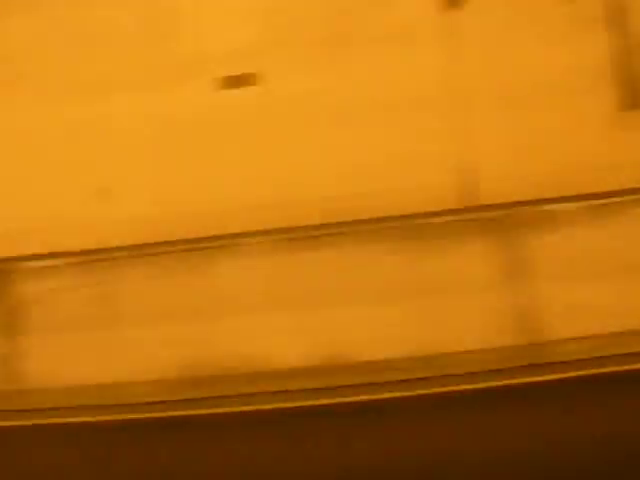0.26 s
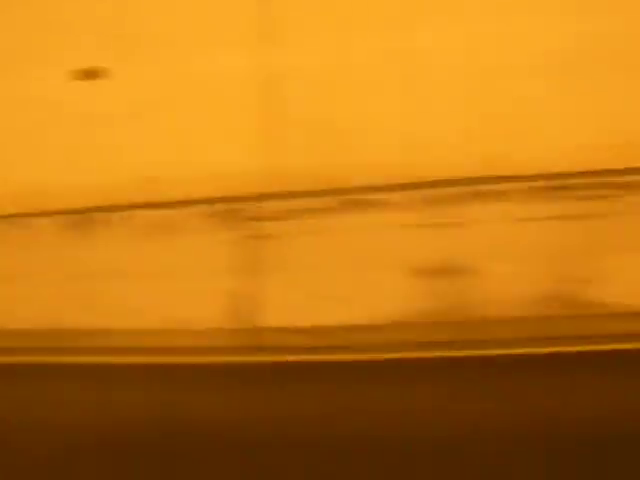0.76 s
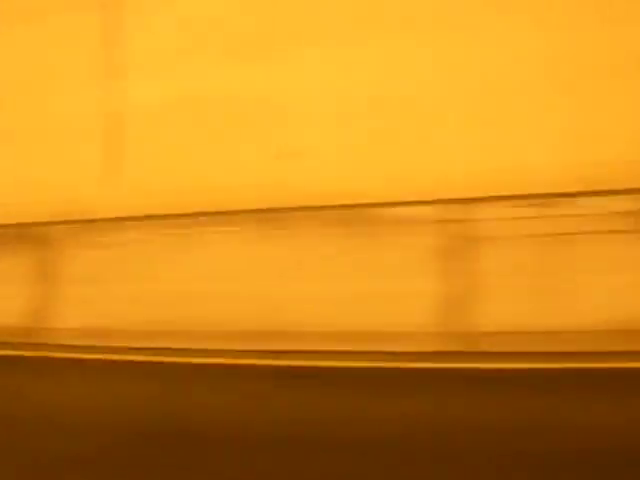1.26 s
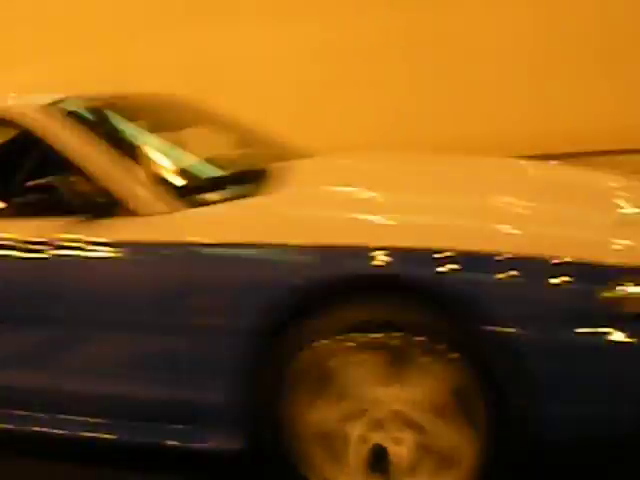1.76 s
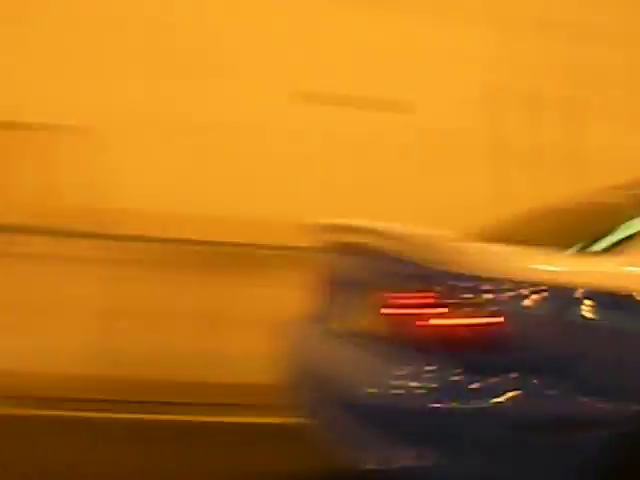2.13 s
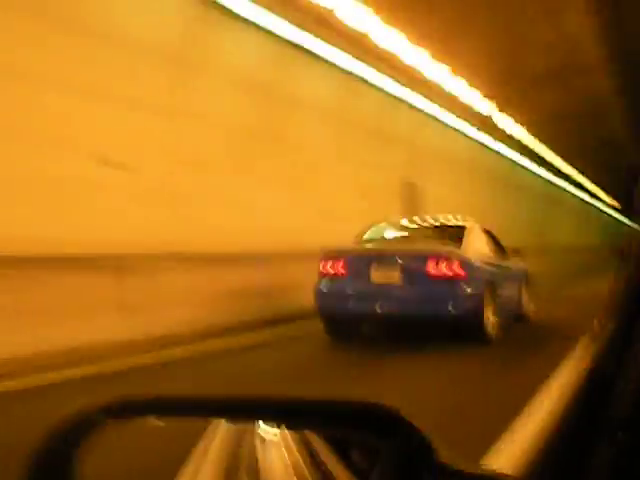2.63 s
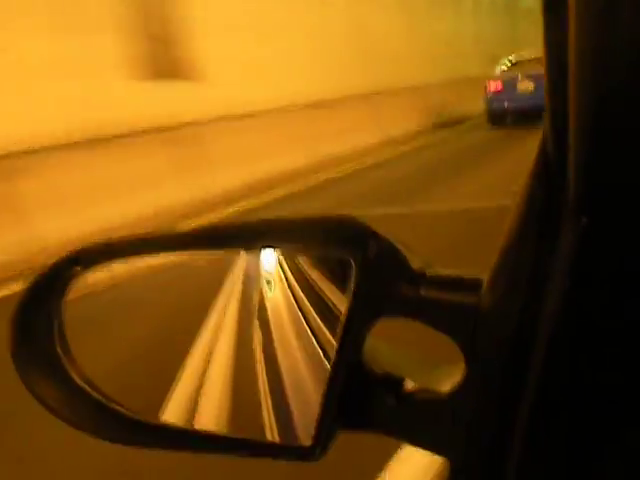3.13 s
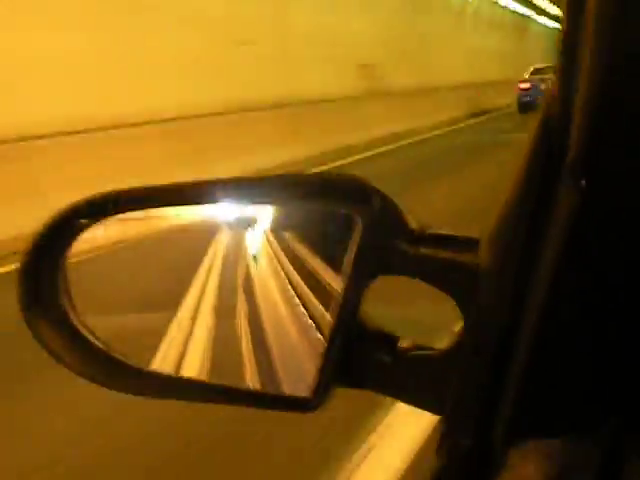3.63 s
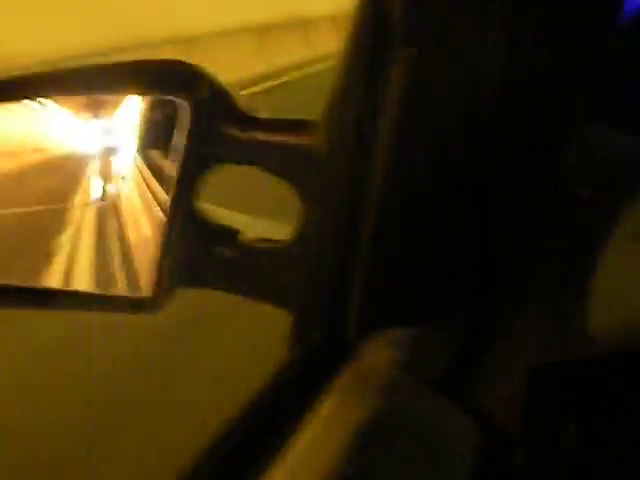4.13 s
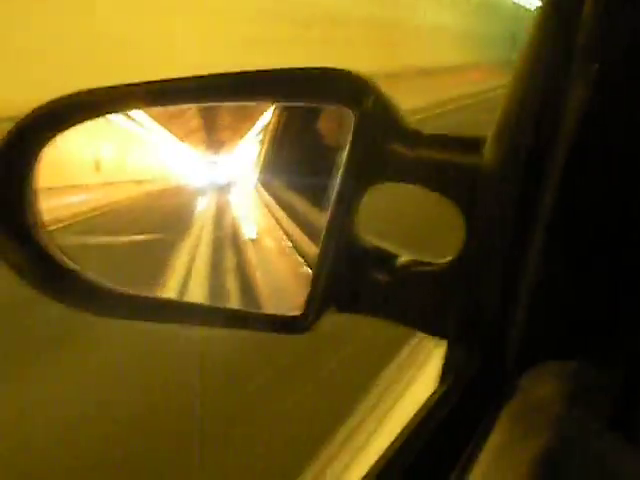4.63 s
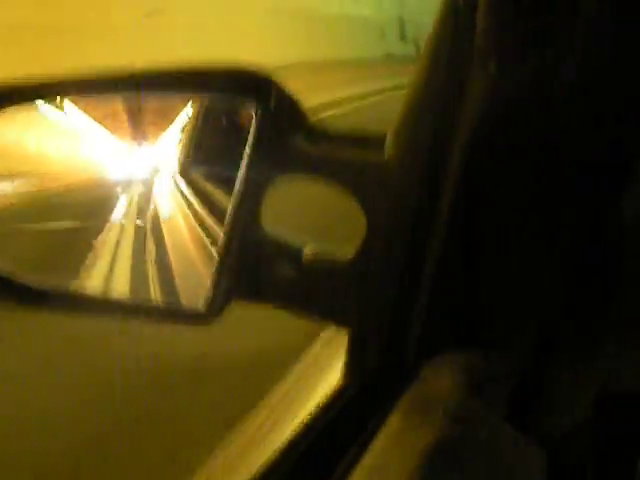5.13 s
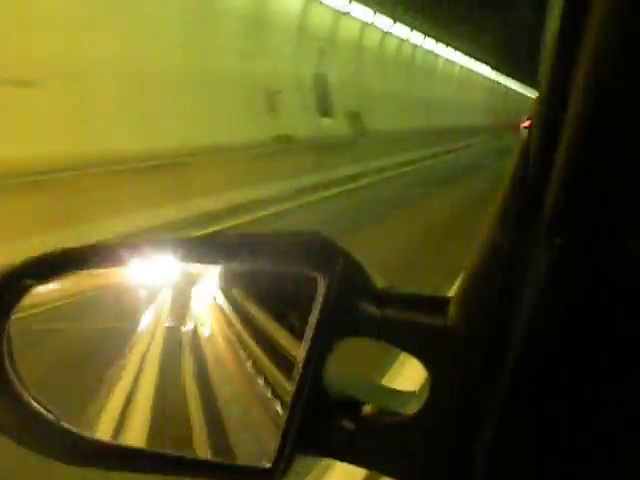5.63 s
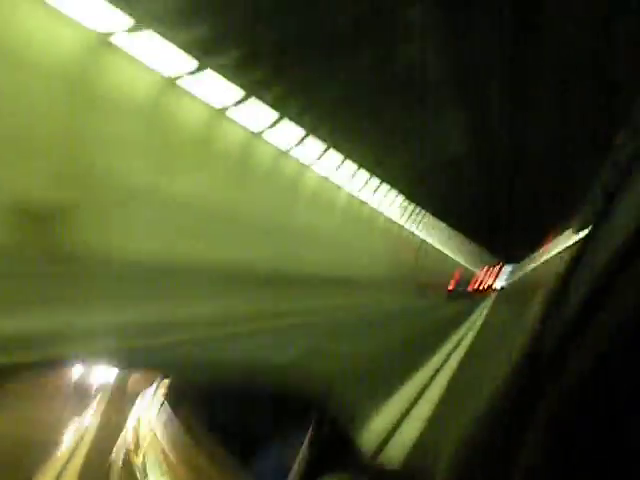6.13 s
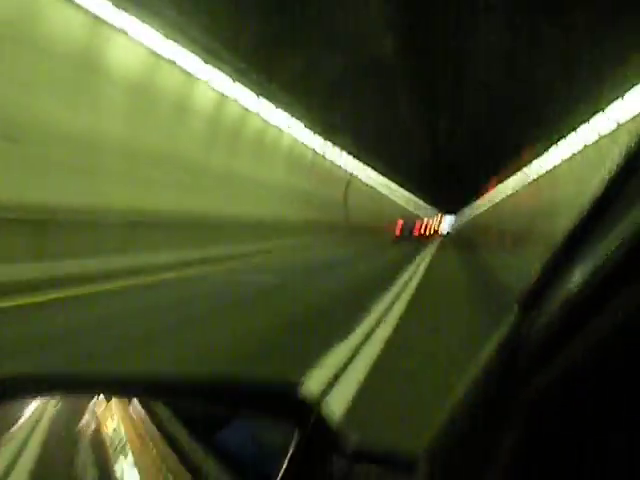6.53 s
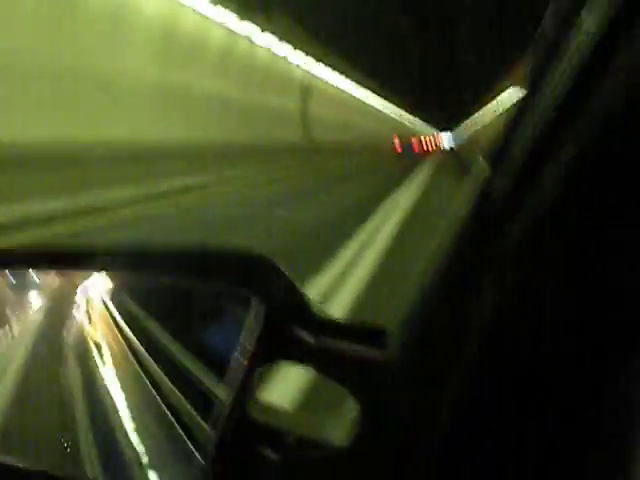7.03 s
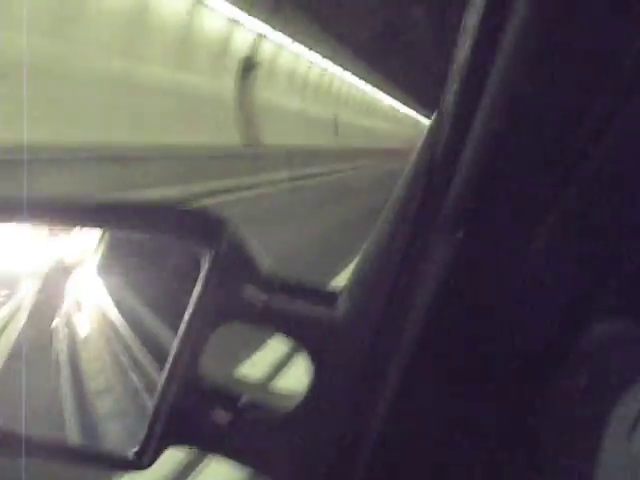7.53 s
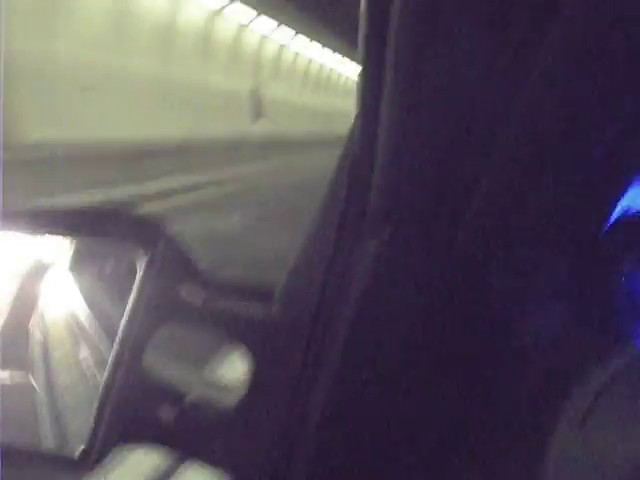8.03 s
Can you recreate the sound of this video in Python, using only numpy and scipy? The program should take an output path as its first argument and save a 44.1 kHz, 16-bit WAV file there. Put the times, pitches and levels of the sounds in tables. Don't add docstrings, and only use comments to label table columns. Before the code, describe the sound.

From a moving car's open window in a concrete tunnel: low traffic roar and a distant engine, then an eight-cylinder car swells past with harsh exhaust rasp and sharp cracks, and pulls ahead. The camera car's own engine climbs beneath. From six seconds, slipstream slaps, thuds and spits on a small, clipping, narrow-band microphone, nearly burying the road.

```python
import sys
import numpy as np
from scipy import signal
from scipy.fft import rfft, irfft, next_fast_len
from scipy.io import wavfile
from scipy.ndimage import uniform_filter1d

SR = 44100
rng = np.random.default_rng(int(sys.argv[2]) if len(sys.argv) > 2 else 0)


def dump_mix(stems):
    frames = np.atleast_2d(stems).T
    limited = np.clip(frames, -1, 1)
    pcm = np.round(limited * 32767).astype(np.int16)
    wavfile.write(sys.argv[1], SR, pcm)


def ratio_of_db(decibels):
    return 10 ** (np.asarray(decibels, float) / 20)


N = 364707
T = np.arange(N) / SR

# (time [s], rate [Hz])
PASSER_FIRING = [(.7, 277), (1.0, 281), (1.4, 292), (1.8, 301), (2.1, 313), (2.4, 307), (2.9, 309),
                 (3.4, 319), (4.7, 322)]
# (multiple of an eighth of the firing rate, level against the firing tone [dB])
PASSER_LINES = [(5, -29), (7, -14), (8, 0), (10, -10), (11, -12), (13, -14), (16, -4), (19, -14), (21, -13),
                (22, -11), (24, -5), (26, -7.5), (27, -11), (34, -13)]
# (alongside [s], level there [dB], held in the tube [dB], gain from behind [dB])
PASSER_TONE_PASS = (2.28, -21.5, -34, 0.5)
# (time [s], level [dB], half width [s])
PASSER_BEATS = [(1.4, 2, .15), (1.7, -3, .1), (1.95, -2, .06), (2.2, 2, .1), (2.45, 2, .08),
                (2.65, -5, .06), (2.85, 1, .1), (3.2, -4, .12), (3.46, 4, .06), (3.65, -4, .06),
                (3.95, 2, .2)]
# (time [s], level [dB], half width [s])
TAILPIPE_SWELLS = [
    (2.25, -2, .15),
    (2.6, 2, .1),
    (3.15, 6, .3),
]


def overtaking_tone():
    tone_db = overtaking(*PASSER_TONE_PASS, lift_s=4.5, fade_db=30)
    tone_db = tone_db - 70 * np.maximum(1.0 - T, 0)
    tone_db = tone_db + bumps(PASSER_BEATS)
    return engine(PASSER_FIRING, tone_db, PASSER_LINES, upper_db=bumps(TAILPIPE_SWELLS))


# (frequency [Hz], level [dB])
RASP_COLOUR = [(90, -58), (150, -33), (240, -22), (310, -12.5), (440, -20), (610, -7.5), (800, -8),
               (1000, -4.5), (1400, -9.5), (2250, -9.5), (3000, -10.5), (3700, -14), (5000, -11.5)]
# (alongside [s], level there [dB], held in the tube [dB], gain from behind [dB])
PASSER_RASP_PASS = (2.26, -13.6, -25, 3.2)
# (time [s], level [dB], half width [s])
RASP_SWELLS = [
    (2.19, .4, .05),
    (2.36, .6, .05),
    (2.5, .6, .04),
    (2.62, -1.2, .06),
    (2.85, -.3, .06),
]


def overtaking_rasp(cycle):
    puffs = 1 + 0.18 * np.cos(8 * cycle) + 0.083 * np.cos(cycle) + 0.17 * np.cos(3 * cycle)
    gas = colour(puffs * rng.standard_normal(N), RASP_COLOUR, flicker_db=.6)
    closest_s, sweep_s, leaving_s, ground_ms = 2.21, .2, .5, .54
    since = T - closest_s
    alongside = 1 / np.sqrt(1 + (since / np.where(since < 0, sweep_s, leaving_s)) ** 2)
    bounce = np.interp(T - ground_ms / 1000 * alongside, T, gas)
    share = .36 * alongside ** 2
    heard = (gas + share * bounce) / np.sqrt(1 + share ** 2)
    level_db = overtaking(*PASSER_RASP_PASS, lift_s=3.25, fade_db=13) + bumps(RASP_SWELLS) + 3.0
    return heard * ratio_of_db(level_db)


def overtaking(alongside_s, near_db, trapped_db, behind_db, lift_s, fade_db):
    gap_s = .2
    along = (T - alongside_s) / gap_s
    distance = np.hypot(1, along)
    direct = ratio_of_db(near_db + behind_db * along / distance) / distance
    return 10 * np.log10(direct ** 2 + ratio_of_db(trapped_db) ** 2) - fade_db * np.maximum(T - lift_s, 0)


# (time [s], peak level [dB], ring [Hz])
EXHAUST_CRACKS = [
    (1.9898, -3, 1100),
    (2.6928, -6, 1100),
    (2.8998, 2, 1200),
]


def exhaust_cracks():
    return spikes(EXHAUST_CRACKS)


# (time [s], rate [Hz])
OWN_FIRING = [(2.9, 118), (3.1, 144), (3.25, 160), (3.4, 172), (4.1, 176), (4.5, 183), (5.3, 191),
              (6.1, 200)]
# (time [s], level [dB])
OWN_LEVEL = [(2.9, -50), (3.05, -45), (3.35, -45), (3.6, -43), (4.0, -45), (4.5, -39), (5.2, -32),
             (5.45, -41), (5.9, -35), (6.2, -50)]
# (multiple of an eighth of the firing rate, level [dB])
OWN_LINES = [(4, -25), (6, -16), (8, -2), (10, -5), (12, -6), (14, -1), (16, 2), (24, -4)]
# (time [s], level [dB])
OWN_UPPER = [(3.0, -7), (4.05, -6), (4.3, 1), (4.8, -3), (5.15, -4), (5.45, 5), (6.0, 1)]


def own_engine():
    level_db = curve(OWN_LEVEL, outside=-90)
    return engine(OWN_FIRING, level_db, OWN_LINES, resonance_db=7, upper_db=curve(OWN_UPPER))[0]


# (time [s], rate [Hz])
FAR_FIRING = [(0, 247), (.4, 253), (1.0, 262), (1.8, 275), (2.4, 280)]
# (time [s], level [dB])
FAR_LEVEL = [(0, -42), (.2, -40), (.4, -36), (1.0, -36), (1.5, -35), (1.8, -31), (2.1, -35), (2.6, -50)]
# (multiple of an eighth of the firing rate, level [dB])
FAR_LINES = [(6, -16), (8, 0), (10, -1), (11, -6), (12, -6), (13, -8), (14, -9), (18, -6), (24, -8),
             (28, -8), (32, -8)]


def far_car():
    return engine(FAR_FIRING, curve(FAR_LEVEL, outside=-90), FAR_LINES, resonance_db=5)[0]


# (time [s], rate [Hz])
LATE_FIRING = [(7.2, 291), (8.27, 294)]
# (time [s], level [dB])
LATE_LEVEL = [(7.3, -50), (7.6, -31), (7.9, -29), (8.27, -29)]
# (multiple of an eighth of the firing rate, level [dB])
LATE_LINES = [(4, -11), (8, 0), (16, -14), (24, -16)]
# (time [s], level [dB])
WHINE_LEVEL = [(7.1, -70), (7.4, -50), (7.65, -44), (8.27, -46)]


def late_car():
    tone = engine(LATE_FIRING, curve(LATE_LEVEL, outside=-90), LATE_LINES)[0]
    whine_hz = 2110
    return tone + ratio_of_db(curve(WHINE_LEVEL) + 2.5 * walk(6)) * np.sin(2 * np.pi * whine_hz * T)


def engine(firing, level_db, orders, resonance_db=0, upper_db=0):
    hz = curve(firing) / 8
    cycle = 2 * np.pi * np.cumsum(hz * (1 + .009 * walk(25))) / SR
    tone = 0
    for k, db in orders:
        pipe = np.exp(-((k * hz - 192) / 6) ** 2)
        branch = np.exp(-((k * hz - 240) / 20) ** 2)
        line_db = db + resonance_db * (pipe + branch) + (k > 8) * upper_db + 2.0 * walk(10)
        tone = tone - ratio_of_db(line_db) * np.cos(k * cycle + (k % 8) ** 2)
    return np.sqrt(2) * tone * ratio_of_db(level_db), cycle


# (time [s], peak level [dB], ring [Hz])
AIR_SLAPS = [(3.4627, -6, 940), (5.6951, -8, 610), (5.9536, -9, 520), (6.0331, -2, 560), (6.0666, -6, 610),
             (6.1463, -6, 510), (6.1944, -4, 440), (6.3337, -6, 580), (6.0215, -5, 600), (6.3885, 1.5, 850),
             (6.4748, -4, 500), (6.4864, 1.5, 800), (6.5224, 2, 850), (6.6066, -3, 630), (6.6368, -8, 950),
             (6.7097, -9, 600), (6.7338, 2, 900), (6.7435, 1, 800), (6.7489, -1, 700), (6.7826, -2, 550),
             (6.8589, -4, 600), (6.9258, -3, 600), (6.5655, -9, 600), (6.9135, -4, 600), (6.752, -4, 450),
             (6.758, -3, 600), (6.8497, 0, 750), (6.885, -5, 640), (6.9318, -3, 670), (6.9534, 0, 550),
             (6.9865, -3, 1020), (7.0397, -3, 650), (7.074, -2.5, 600), (7.1081, -4, 480),
             (7.1669, -3, 390), (7.1834, -5, 520), (7.2509, -4, 540), (7.3136, -7, 470), (7.3754, -9, 660),
             (7.4017, -4, 360), (7.4494, .7, 800), (7.5158, -7, 480), (7.5825, -9, 590), (7.7456, -6, 550),
             (7.7879, -4, 740), (7.8257, -10, 960), (7.8844, -7, 610)]


def slaps():
    return spikes(AIR_SLAPS)


def spikes(events):
    out, t = np.zeros(N), np.arange(-300, 500) / SR
    tip_db, tip_ms = -15, .12
    tip = ratio_of_db(tip_db) * np.exp(-(t * 1000 / tip_ms) ** 2)
    for start, db, hz in events:
        decay = np.exp(-np.abs(t) * hz * np.where(t < 0, 2.2, 1.1))
        shape = decay * np.cos(2 * np.pi * hz * t) + tip
        at = int(start * SR)
        out[at - 300:at + 500] += np.sign(rng.random() - .55) * ratio_of_db(db + .3) * shape
    return out


# (start [s], length [ms], level
# [dB], treble share [dB])
WIND_GUSTS = [(5.946, 10, -19, -24), (6.028, 8, -15.5, -15), (6.062, 18, -18.5, -17),
              (6.143, 10, -16.5, -18), (6.186, 14, -12.5, -17), (6.214, 12, -20.5, -21),
              (6.32, 18, -15.5, -19), (6.382, 13, -13.0, -19), (6.395, 19, -13.0, -17),
              (6.421, 14, -18.0, -15), (6.437, 21, -17.5, -18), (6.466, 14, -12.0, -16),
              (6.48, 20, -12.5, -13), (6.519, 21, -13.0, -15), (6.56, 18, -18.0, -18),
              (6.582, 14, -18.5, -16), (6.605, 12, -13.5, -12), (6.632, 12, -16.5, -13),
              (6.65, 14, -19, -17), (6.706, 15, -16.5, -20), (6.73, 19, -10.5, -14),
              (6.768, 26, -12.5, -16), (6.796, 27, -14.5, -12), (6.835, 32, -12.0, -16),
              (6.88, 24, -15.5, -15), (6.91, 29, -13.0, -15), (6.949, 13, -12.0, -21),
              (6.982, 14, -13.5, -9), (7.0, 19, -16.5, -15), (7.034, 15, -14.5, -19),
              (7.064, 17, -13, -17), (7.1, 23, -12.5, -16), (7.153, 21, -14.5, -19),
              (7.178, 16, -16.0, -15), (7.246, 18, -14.0, -13), (7.276, 17, -20.0, -18),
              (7.311, 8, -19, -21), (7.396, 6, -18, -21), (7.447, 14, -17, -13), (7.51, 11, -15.0, -22),
              (7.577, 11, -19.5, -17), (7.674, 40, -18.0, -15), (7.741, 15, -16.0, -15),
              (7.778, 15, -15.0, -14), (7.819, 14, -18.0, -11), (7.86, 14, -17.5, -18),
              (7.879, 12, -16.5, -16), (7.966, 29, -16.0, -14), (8.055, 12, -20, -14),
              (8.213, 18, -17.5, -15),
              (5.775, 30, -18, -20), (6.083, 9, -17.5, -19), (6.503, 10, -16.5, -17),
              (6.749, 13, -11.5, -11), (6.823, 12, -15, -14), (7.024, 7, -18, -22), (6.675, 14, -21, -16),
              (7.056, 8, -14, -17), (7.222, 17, -18, -21), (7.495, 12, -23, -17), (7.565, 6, -27, -22),
              (7.625, 20, -23, -9), (8.135, 12, -20, -16), (8.155, 10, -22, -8), (8.175, 12, -19, -16),
              (8.234, 22, -18, -13)]


def gusts():
    below = signal.butter(2, 1500, fs=SR, output="sos")
    above = signal.butter(2, 1300, "high", fs=SR, output="sos")
    low = signal.sosfiltfilt(below, eddies(900, spread_db=1.8, hiss=0.56))
    high = signal.sosfiltfilt(above, eddies(300, spread_db=2.1, hiss=.6))
    low = low / uniform_filter1d(low ** 2, size=250) ** .25
    body, edge = np.zeros(N), np.zeros(N)
    for start, ms, db, treble_db in WIND_GUSTS:
        inside = slice(int(start * SR), int((start + ms / 1000) * SR))
        body[inside] = ratio_of_db(db) / np.std(low[inside])
        edge[inside] = ratio_of_db(db + treble_db - 2.5) / np.std(high[inside])
    body, edge = dying_away(body), dying_away(edge)
    for start, _, _ in AIR_SLAPS:
        body[int((start - .002) * SR):int((start + .003) * SR)] *= .15
    body = uniform_filter1d(body, int(.003 * SR))
    edge = uniform_filter1d(edge, int(.003 * SR))
    coarse = T[::300]
    throb_db = np.interp(T, coarse, rng.standard_normal(len(coarse)))
    crackle_db = -43 + .5 * bumps(WIND_LULLS) + 3.5 * walk(30)
    crackle = (T > 5.9) * ratio_of_db(crackle_db) * high / np.std(high)
    return (body * low + edge * high) * ratio_of_db(throb_db) + crackle


def dying_away(envelope):
    keep = np.exp(-1000 / 3 / SR)
    return np.maximum(envelope, signal.lfilter([1 - keep], [1, -keep], envelope))


# (frequency [Hz], level [dB])
GUST_COLOUR = [(24, -61.5), (60, -30), (130, -17.5), (230, -1.5), (460, -1.5), (800, -9), (1220, -11.5),
               (1900, -19), (3500, -28.5), (5000, -30)]


def eddies(per_s, spread_db, hiss):
    timing, sign, size = rng.random((3, N))
    pops = (timing < per_s / SR) * np.sign(sign - .5) * ratio_of_db(-spread_db * np.log(size + 1e-9))
    return colour(unit(pops) + hiss * rng.standard_normal(N), GUST_COLOUR)


# (time [s], peak level [dB])
EDDY_SPITS = [(5.9747, -16), (6.031, -19), (6.064, -17), (6.0739, -18), (6.1438, -22), (6.1847, -13),
              (6.2176, -22), (6.276, -21), (6.3842, -18), (6.4476, -26), (6.471, -19), (6.483, -12),
              (6.5229, -13), (6.5888, -18), (6.6067, -15), (6.6347, -13), (6.6806, -22), (6.7085, -19),
              (6.7344, -10), (6.8083, -13), (6.857, -16), (6.31, -22), (6.342, -22), (6.8836, -18),
              (6.9185, -17), (6.9295, -14), (6.9549, -19), (6.9684, -18), (6.9859, -11), (7.0133, -19),
              (7.0382, -19), (7.0612, -16), (7.0712, -11), (7.1041, -15), (7.155, -21), (7.2168, -23),
              (7.2508, -14), (7.2832, -20), (7.3136, -23), (7.3356, -25), (7.3735, -21), (7.4239, -25),
              (7.4478, -17), (7.4598, -14), (7.5007, -24), (7.5606, -26), (7.58, -24), (7.6893, -16),
              (7.7421, -20), (7.786, -16), (7.805, -22), (7.8245, -15), (7.9631, -20), (8.0564, -24),
              (8.2136, -19)]


def spits():
    rise_ms, fall_ms = .6, 2.5
    starts = np.zeros(N)
    for s, db in EDDY_SPITS:
        starts[int(s * SR)] = ratio_of_db(db - 1)
    band = signal.butter(1, [1100, 3000], "band", fs=SR, output="sos")
    bright = signal.sosfilt(band, rng.standard_normal(N))
    fading = signal.lfilter([1], [1, -np.exp(-1000 / fall_ms / SR)], starts)
    return uniform_filter1d(fading, size=int(rise_ms * SR / 1000)) * unit(bright)


# (time [s], level [dB])
WIND_PRESS = [(4.5, 3.5), (5.96, 2.5), (6.04, -6.5), (7.1, -7), (7.55, -8), (7.68, 1), (8.27, 0)]
# (time [s], level [dB], half width [s])
WIND_LULLS = [(5.5, 4, .07), (5.683, -5, .008), (6.045, -4, .012), (6.25, -4, .025), (6.55, -8, .012),
              (6.875, -8, .008), (7.09, -4, .008), (7.41, -5, .01), (7.545, -5, .015), (6.22, 4, .015),
              (6.29, 5, .04), (6.1, -3, .06), (6.57, 4, .08), (6.755, 10, .012), (6.8, 9, .04),
              (7.23, 5, .02), (6.95, 8, .06), (7.36, 1, .04), (7.69, 3, .03), (7.85, -7, .04),
              (8.26, -4, .03)]


def pressed_down():
    return ratio_of_db(curve(WIND_PRESS) + bumps(WIND_LULLS))


# (time [s], level [dB])
BUFFET_LEVEL = [(0, -46), (1, -46), (3.4, -54), (3.9, -44), (4.75, -35), (5.5, -35), (5.75, -30),
                (7.0, -27.5), (7.5, -34), (8.27, -30)]
# (time [s], level [dB], half width [s])
CAR_WAKE = [
    (1.97, 14, .08),
    (2.85, 15, .07),
]


def buffet():
    band = signal.butter(2, [122, 225], "band", fs=SR, output="sos")
    low = signal.sosfilt(band, rng.standard_normal(N))
    return unit(low) * ratio_of_db(curve(BUFFET_LEVEL) + bumps(CAR_WAKE) + 2.5 * walk(14))


# (time [s], level [dB])
TYRE_LEVEL = [(3.0, -50), (3.6, -33), (4.2, -34), (4.6, -44), (5.9, -46), (8.27, -46)]
# (frequency [Hz], level [dB])
TYRE_COLOUR = [(700, -20), (1500, 0), (2500, -3), (3800, -7), (5000, -8)]


def tyres():
    return colour(rng.standard_normal(N), TYRE_COLOUR) * ratio_of_db(curve(TYRE_LEVEL) + 1.5 * walk(20))


# (time [s], level [dB])
ROAR_LEVEL = [(0, -22.5), (.7, -21.5), (1.5, -25), (3.5, -26), (4.1, -21), (5, -22), (5.95, -22)]
# (frequency [Hz], level [dB])
ROAR_COLOUR = [(90, -49), (160, -33), (195, -23), (230, -17), (265, -2.5), (300, 1.5), (350, -0.5),
               (430, -6), (580, -4), (990, -5.5), (1500, -13.5), (2200, -20.5), (3500, -30.5), (5000, -33)]


def roar():
    noise = colour(rng.standard_normal(N), ROAR_COLOUR, flicker_db=.7)
    return noise * ratio_of_db(curve(ROAR_LEVEL) + .8 * walk(20))


def tunnel(x):
    t60_s, t = 1.2, T[:int(SR * 1.5)]
    tail = rng.standard_normal(len(t)) * np.exp(-np.log(1000) * t / t60_s) * (t > .015)
    return signal.fftconvolve(x, tail / np.linalg.norm(tail))[:N]


def curve(rows, outside=None):
    return np.interp(T, *np.transpose(rows), left=outside, right=outside)


def bumps(rows):
    return sum(db * np.exp(-((T - s) / width) ** 2) for s, db, width in rows)


def unit(x):
    return x / np.sqrt(np.mean(x ** 2))


def walk(rate):
    held = np.repeat(rng.standard_normal(int(N / SR * 30) + 2), 8)
    slewed = uniform_filter1d(uniform_filter1d(held, size=8), size=8)
    return 1.3 * np.interp(T * min(rate, 30) * 8, np.arange(len(held)), slewed)


def colour(x, spectrum, flicker_db=0):
    size = next_fast_len(N)
    octave = np.log2(np.maximum(np.arange(size // 2 + 1) * SR / size, 1))
    hz, db = np.transpose(spectrum)
    shaped = rfft(x, size) * ratio_of_db(np.interp(octave, np.log2(hz), db, right=-90))
    if not flicker_db:
        return unit(irfft(shaped, size)[:N])
    out = np.zeros(N)
    for centre in range(6, 14):
        band = np.clip(1 - np.abs(octave - centre), 0, 1)
        out += irfft(shaped * band, size)[:N] * ratio_of_db(flicker_db * walk(12))
    return unit(out)


def scene():
    passer, cycle = overtaking_tone()
    exhausts = passer + far_car() + own_engine()
    exhausts = ratio_of_db(-1.5) * (exhausts + ratio_of_db(-5) * tunnel(exhausts))
    road = (exhausts + roar() + tyres() + late_car()) * pressed_down()
    road = road + overtaking_rasp(cycle) + exhaust_cracks()
    wind = gusts() + slaps() + buffet() + spits()
    fade_out = np.minimum((T[-1] - T) / .006, 1)
    return (road + wind)[None] * fade_out


def low_pass(x):
    return signal.sosfilt(signal.butter(12, 15870, fs=SR, output="sos"), x)


def record(dry):
    overload, ceiling, offset = 0.61, .705, -.003
    flat = np.clip(dry, -overload, overload)
    narrow = signal.sosfilt(signal.butter(13, 3830, fs=SR, output="sos"), flat)
    narrow = signal.sosfilt(signal.cheby2(10, 50, 4950, fs=SR, output="sos"), narrow)
    narrow = signal.sosfilt(signal.butter(2, 66, "high", fs=SR, output="sos"), narrow)
    shake = signal.sosfilt(signal.butter(4, 55, fs=SR, output="sos"), rng.standard_normal(N))
    narrow = narrow + ratio_of_db(-66) * unit(shake)
    mix = np.clip(narrow + offset, -ceiling, ceiling)
    return low_pass(mix)


dry = scene()
out = record(dry)
dump_mix(out)
```